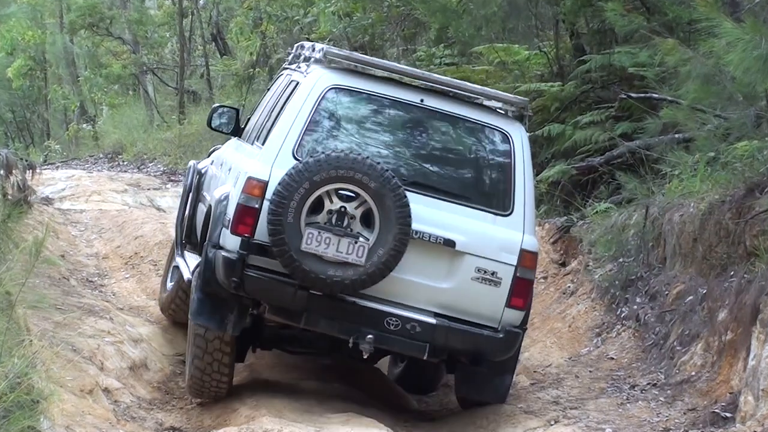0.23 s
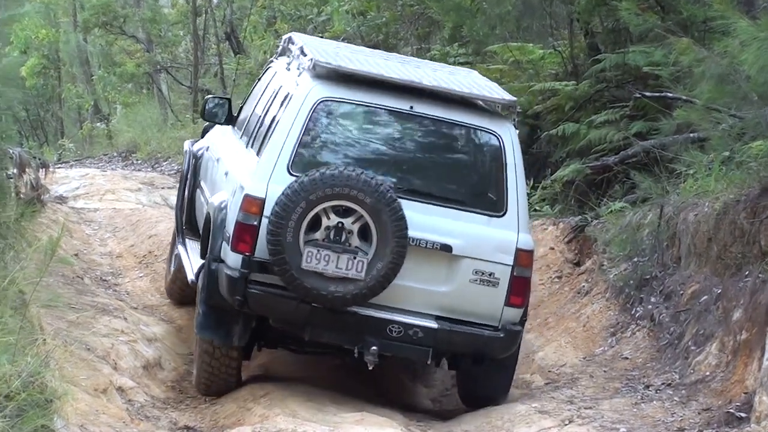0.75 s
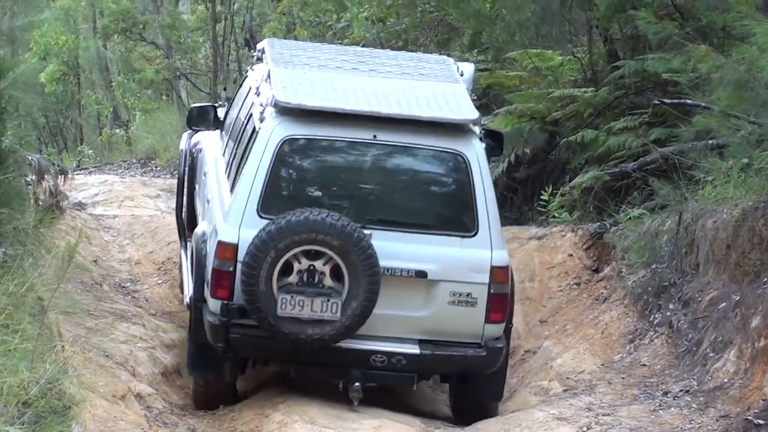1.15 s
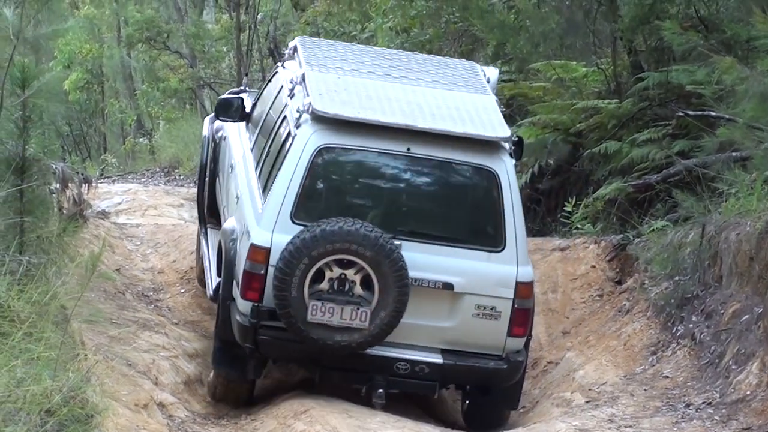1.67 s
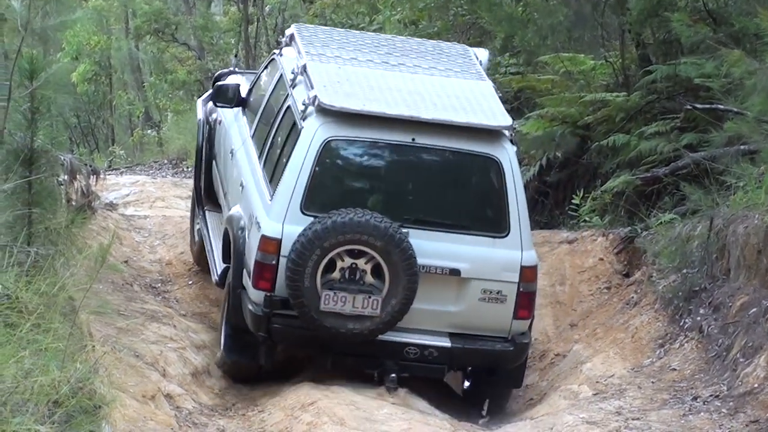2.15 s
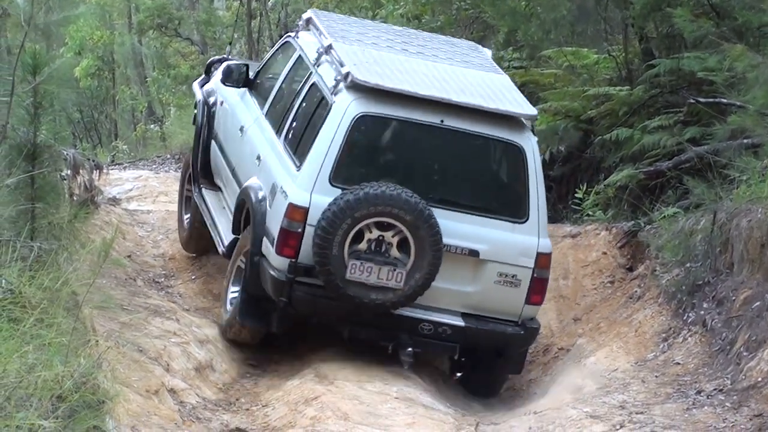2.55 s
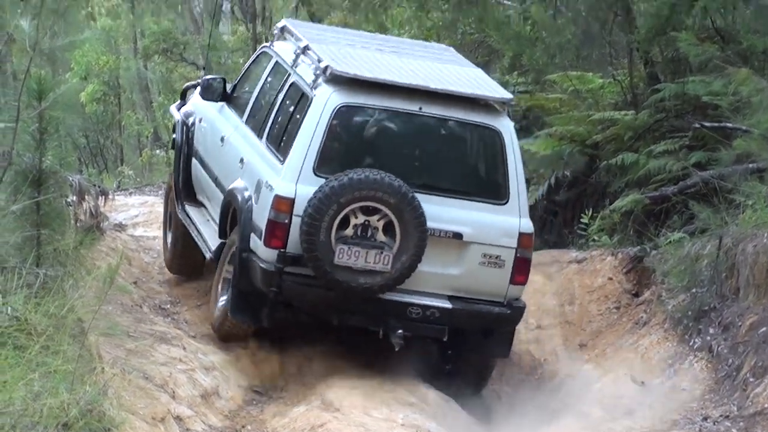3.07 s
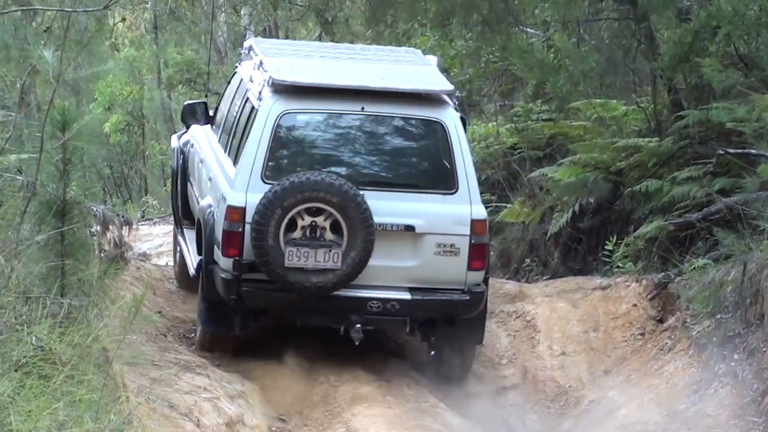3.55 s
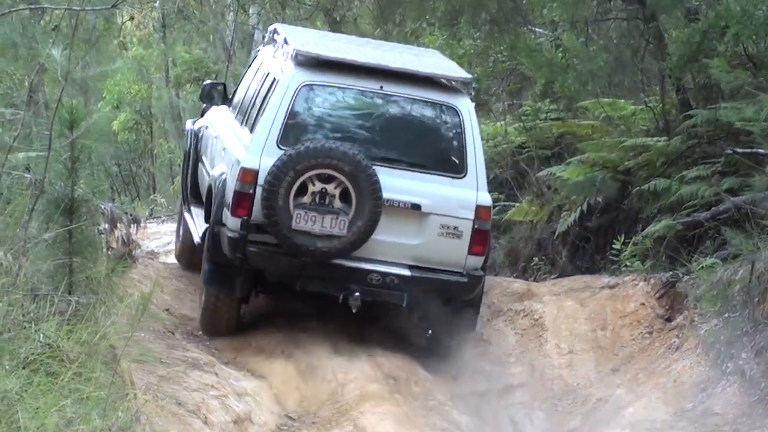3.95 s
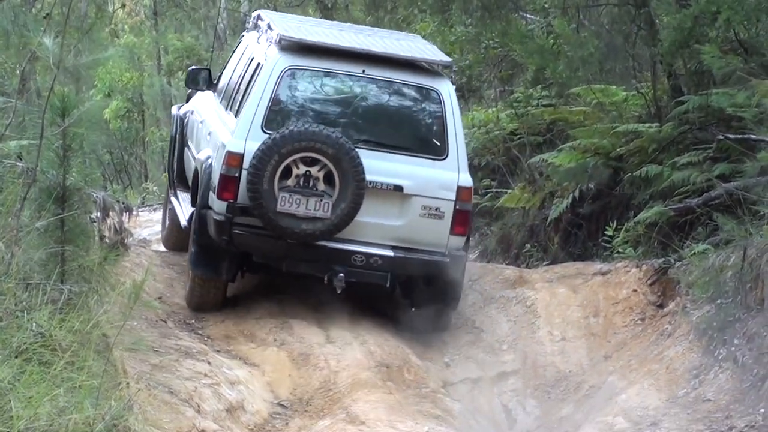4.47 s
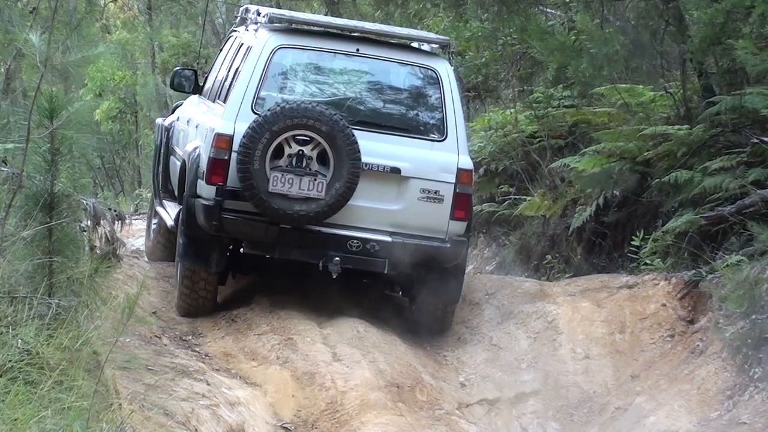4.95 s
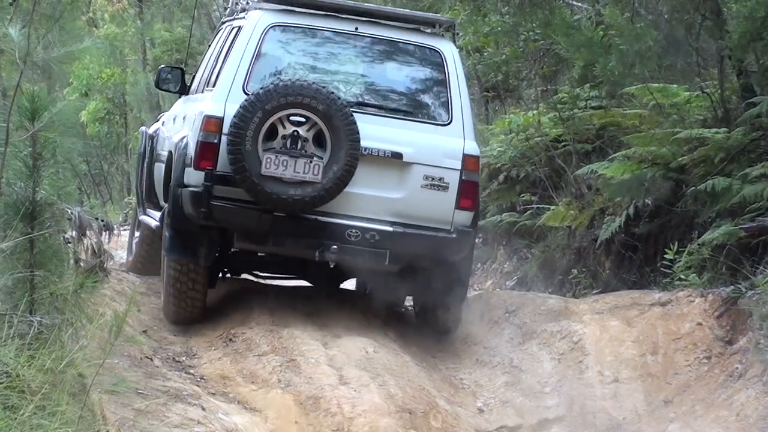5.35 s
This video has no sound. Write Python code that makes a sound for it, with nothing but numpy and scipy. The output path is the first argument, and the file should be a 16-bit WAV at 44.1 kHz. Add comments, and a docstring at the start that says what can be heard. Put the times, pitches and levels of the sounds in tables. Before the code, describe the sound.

Cicadas drone and rasp around a rumbling diesel truck that surges up a dirt ledge with spinning tyres, then drops to idle.

```python
"""A six-cylinder diesel truck crawls up a rutted forest track, revs once with its tyres scrabbling, and drops back to idle.
Firing tones and coloured noise make its exhaust; noise bursts and fan roar fill the engine bay; random grains are the tyres.
Cicadas sing all around: some drone in wavering sine partials, a near one rasps in paired clicks. Noise makes the forest.
The exhaust boom pushes an automatic gain control down, and the cicadas swell back slowly afterwards."""
import sys
import numpy as np
from scipy import signal
from scipy.fft import rfft, irfft, next_fast_len
from scipy.io import wavfile
from scipy.ndimage import uniform_filter1d, minimum_filter1d

SR = 44100
rng = np.random.default_rng(int(sys.argv[2]) if len(sys.argv) > 2 else 0)


def transcribe(u):
    """Save the signal u as a 16-bit wav file named by the first command-line argument.

    u: samples, shape (n,) or (channels, n), limited to [-1, 1]; the rate is SR.
    q: integer samples, one column per channel.
    """
    v = np.clip(np.atleast_2d(u).T, -1, 1)
    q = np.round(v * 32767).astype(np.int16)
    wavfile.write(sys.argv[1], SR, q)


N = 247401
LEFT_RIGHT = np.array([[1], [-1]])  # opposite signs for the two ports


def from_db(db):
    """Logarithmic level: decibels to amplitude gain."""
    return 10 ** (np.asarray(db) / 20)


def rms_one(x):
    """Power normalisation: scale to a mean square of 1."""
    return x / np.sqrt(np.mean(x ** 2) + 1e-20)


def in_time(rows):
    """Linear interpolation: a (time, value) curve read at every sample."""
    time_s, value = np.transpose(rows)
    return np.interp(np.arange(N) / SR, time_s, value)


def at_hz(points, hz):
    """Interpolation over log frequency: a (frequency, value) curve read at any frequency."""
    known_hz, value = np.transpose(points)
    return np.interp(np.log(hz + 1e-3), np.log(known_hz), value)


def colour(x, spectrum):
    """Spectral filtering: multiply the transform by a gain curve, then scale to rms 1."""
    size = next_fast_len(N + 4096)  # zero padding
    gain = from_db(at_hz(spectrum, np.fft.rfftfreq(size, 1 / SR)))
    return rms_one(irfft(rfft(x, size) * gain, size)[..., :N])


def drift(rate):
    """Low-passed noise: a smooth random curve of rms 1 that changes about `rate` times a second."""
    pole = np.exp(-80 * np.pi * rate / SR)
    noise = rng.standard_normal(N // 40 + 2002)  # one value per 40 samples
    slow = signal.lfilter([1], [1, -2 * pole, pole * pole], noise)[2000:]  # the filter has settled
    return np.interp(np.arange(N) / 40, np.arange(len(slow)), rms_one(slow))


def air(width):
    """Partial coherence: white noise common to both ports plus a share `width` in opposite phase."""
    common = rng.standard_normal(N)
    opposed = rng.standard_normal(N) * LEFT_RIGHT
    return common + width * opposed


def pan(db):
    """Level difference: left and right gains that differ by db."""
    return from_db(LEFT_RIGHT * db / 2)


def spread(x, firing_hz, idle_lead, lead):
    """Phase difference: the right port leads by a chosen angle (radians), set for low and high firing rates."""
    phase = np.interp(firing_hz, [73, 92], [idle_lead, lead])
    analytic = signal.hilbert(x, next_fast_len(N))[..., :N]
    return np.real(analytic * np.exp(-.5j * phase * LEFT_RIGHT))


def turns_of(hz):
    """Phase is the integral of frequency: cycles completed so far."""
    return np.cumsum(hz) / SR


def tone(turns, rough=0, rate=1):
    """Random modulation: a sine of rms 1 whose strength and phase flutter by the share `rough`."""
    flutter = 1 + rough * (drift(rate) + 1j * drift(rate)) if rough else 1
    return rms_one(np.real(flutter * np.exp(2j * np.pi * turns)))


# How well the underbody lets engine lines out; columns: freq_hz [Hz], gain_db [dB]
UNDERBODY = [(100, -3), (210, 0), (280, 3.5), (400, -2), (450, -15), (560, -9), (760, -6), (900, 9),
             (1400, -18)]


def lines(base_hz, table, rough, rate):
    """Harmonics through a fixed response: multiples of a rotation rate swell and fade as they glide."""
    turns = turns_of(base_hz)
    total = 0
    for multiple, db in table:
        k = round(multiple)
        gain = from_db(db + at_hz(UNDERBODY, k * base_hz))
        total = total + gain * tone(k * turns, rough, rate)
    return total


def firings(turns, decay, scatter_db, between):
    """Exponential decay: bursts of random strength, dying over `decay` of the interval, on a floor `between`."""
    count = turns.astype(int)
    strength = from_db(scatter_db * rng.standard_normal(2000))
    return rms_one(between + strength[count] * np.exp(-(turns - count) / decay))


# Exhaust pipe response, booming between 100 and 150 Hz; columns: freq_hz [Hz], level_db [dB at idle load]
PIPE = [(62, -35), (68, -29.5), (76, -24.5), (86, -23.5), (105, -19), (130, -21), (150, -19), (168, -32.5),
        (185, -32), (215, -38), (250, -48), (300, -42)]
IDLE_HZ = 64.6  # firing rate
# exhaust rumble: level at idle (dB), growth with speed (dB per octave), share of the load that it follows
RUMBLE_DB, RUMBLE_DB_PER_OCTAVE, RUMBLE_FOLLOWS_LOAD = -26, 10, 0.14
# engine bay noise (dB): steady up to the knee (Hz), then growing with speed (dB per octave)
BAY_DB, BAY_KNEE_HZ, BAY_DB_PER_OCTAVE = -27.5, 85.7, 15
# the truck crawls away; the bay is screened by the body and fades faster than the tailpipe
TAILPIPE_FADE_DB_PER_S, BAY_FADE_DB_PER_S = 0.17, 0.7


def engine_levels(firing_hz, load_db):
    """Source strength and distance: speed, load and fading set firing tone, octave, rumble and bay levels (dB)."""
    s = np.arange(N) / SR
    boom_db = load_db + at_hz(PIPE, firing_hz)
    octave_db = load_db + at_hz(PIPE, 2 * firing_hz)
    speed_db = RUMBLE_DB_PER_OCTAVE * np.log2(firing_hz / IDLE_HZ)
    rumble_db = RUMBLE_DB + speed_db + RUMBLE_FOLLOWS_LOAD * load_db
    octaves_above_knee = np.maximum(np.log2(firing_hz / BAY_KNEE_HZ), 0)
    bay_db = BAY_DB + BAY_DB_PER_OCTAVE * octaves_above_knee
    return boom_db, octave_db, rumble_db - TAILPIPE_FADE_DB_PER_S * s, bay_db - BAY_FADE_DB_PER_S * s


# Lines from unequal cylinders; columns: multiple [of the six-firing cycle rate], level_db [relative dB]
UNEVEN = [(8, -11), (9, -9.5), (10, -9), (14, -17.5), (15, -15.5), (16, -7.5), (18, -16.5), (22, -19),
          (24, -16.5)]
# Exhaust rumble spectrum; columns: freq_hz [Hz], level_db [relative dB per Hz]
RUMBLE = [(25, -43), (50, -29), (80, -13.5), (130, 1.5), (185, 4.5), (250, -3.5), (340, -4.5), (400, -11),
          (480, -25.5), (700, -60)]


def exhaust(firing_hz, boom_db, octave_db, rumble_db):
    """Periodic gas pulses: firing tones, weaker lines from unequal cylinders, and noisy puffs at the tailpipe."""
    turns = turns_of(firing_hz)
    boom = from_db(boom_db) * tone(turns) + from_db(octave_db) * tone(2 * turns)
    uneven = lines(firing_hz / 6, UNEVEN, rough=.45, rate=6)
    bursts = firings(turns, decay=0.55, scatter_db=-0.5, between=0.44)
    puffs = colour(rng.standard_normal(N) * bursts, RUMBLE)
    return boom + from_db(rumble_db) * (from_db(-3.0) * uneven + from_db(-1.0) * puffs)


# Fan blade tones; columns: multiple [of the blade rate], level_db [relative dB]
BLADES = [(1, -2.5), (2, -15), (3, -28)]


def fan_tones(firing_hz, rumble_db):
    """Blade-passing tones: the viscous clutch slips more at speed, so the blade rate lags behind the engine."""
    blades_per_firing = np.interp(firing_hz, [72, 88, 145], [3.26, 3.18, 3.09])
    blades = lines(firing_hz * blades_per_firing, BLADES, rough=.35, rate=10)
    return from_db(rumble_db - 3.0 - 0.042 * (firing_hz - 54)) * blades


# Diesel knock spectrum; columns: freq_hz [Hz], level_db [relative dB per Hz]
CLATTER = [(250, -26), (400, -4), (490, -7.5), (620, -3), (800, -1.5), (1150, -2), (1480, 1), (1750, -3.5),
           (2000, -0.5), (2250, -6), (2450, -1.5), (2650, -16), (3050, -3.5), (3400, -19), (4400, -37)]
# Air through the cooling fan; columns: freq_hz [Hz], level_db [relative dB per Hz]
ROAR = [(260, -57), (450, -6.5), (515, -9.5), (595, -5.5), (670, -3.5), (878, -3), (1090, -7), (1390, -6.5),
        (1660, -9.5), (1880, -12.5), (2270, -19), (2550, -17), (3400, -19), (4420, -49), (7480, -120)]


def engine_bay(firing_hz, turns, bay_db, takeover_hz=92):
    """Impulsive and flow noise: diesel knock rules at idle; the fan's roar grows steeply with speed and covers it."""
    fan_share = 1 / (1 + (takeover_hz / firing_hz) ** 7)  # of power
    bursts = firings(turns, decay=0.34, scatter_db=3, between=1.0)
    knock = colour(air(width=0.033) * bursts, CLATTER)
    roar = colour(air(width=0.027) * from_db(0.87 * drift(22.0)), ROAR)
    knock_part = from_db(-2.28) * np.sqrt(1 - fan_share) * knock
    roar_part = from_db(0.84) * np.sqrt(fan_share) * roar
    return from_db(bay_db) * (knock_part + roar_part)


# Timing gear whine, heard while the truck is close; columns: time_s [s], level_db [relative dB]
WHINE = [(0, -42), (.6, -36.5), (1.2, -43), (1.5, -57), (1.8, -38), (2.1, -63)]


def gear_whine(firing_hz):
    """Tooth-mesh frequency: gear teeth meet 23 times a firing and sound a fluttering tone."""
    return from_db(in_time(WHINE)) * tone(23 * turns_of(firing_hz), rough=1.2, rate=25)


# Distant insects and leaves; columns: freq_hz [Hz], level_db [relative dB per Hz]
FOREST = [(40, -18), (500, -13.5), (760, -4.5), (1150, -12), (2000, -7), (2800, -7.5), (3400, -7),
          (3800, 2.5), (4400, 1), (5200, -6), (6600, -2), (8500, -11.5), (9500, -12.5), (10500, -27.5),
          (13000, -29.5), (16000, -30)]
FOREST_DB, FOREST_PAN_DB = -26.5, 1.0  # level; left minus right


def forest_air():
    """Diffuse sound: many distant insects and leaves merge into steady coloured noise."""
    return pan(FOREST_PAN_DB) * from_db(FOREST_DB) * colour(air(width=0.12), FOREST)


# Droning cicadas' partials; columns: pitch_hz [Hz, before wander], level_db [relative dB]
DRONE = [(4667, -48), (4780, -44), (4888, -46), (5017, -40), (5103, -40), (5259, -35), (5329, -41),
         (5496, -31), (5550, -34), (5722, -34), (5771, -34), (5965, -30), (6223, -34), (6444, -36),
         (6691, -41)]
DRONE_DB, DRONE_PAN_DB = 4, -1  # gain on the partials; left minus right


def droning_cicadas(wander=0.0010584, width=0.096):
    """Multipath fading: fast tymbals' clear partials waver together and fade singly on paths through the trees."""
    clock = turns_of(1 + wander * drift(2.78))
    direct = sum(from_db(db) * tone(hz * clock, rough=0.86, rate=12.7) for hz, db in DRONE)
    scattered = sum(from_db(db) * tone(hz * clock, rough=2.8, rate=9) for hz, db in DRONE)
    return pan(DRONE_PAN_DB) * from_db(DRONE_DB) * (direct + width * scattered * LEFT_RIGHT)


# The near cicada's click spectrum; columns: freq_hz [Hz], level_db [relative dB per Hz]
RASP = [(6000, -45), (6500, -12), (6750, -7), (7000, -2), (7550, 2.5), (8000, 1), (8400, -6), (8800, -13),
        (9200, -49), (9650, -35), (10400, -43), (12000, -72)]
RASP_HZ = 81.9  # mean rate of muscle pulls
RASP_DB, RASP_ECHO_DB, RASP_PAN_DB = -23.5, -21.5, 3  # clicks; hiss; left minus right


def rasping_cicada(pair_gap_s=.00165, jitter_s=.00005, scatter_db=2.0):
    """Buckling: each muscle pull clicks the tymbal twice; the trees smear the clicks into a hiss behind them."""
    pull_turns = turns_of(RASP_HZ * (1 + .003 * drift(2)))
    pulls = np.flatnonzero(np.diff(np.floor(pull_turns)))
    clicks = np.zeros(N)
    for delay in (0, pair_gap_s):
        chance = rng.uniform(-1, 1, (600, 2))[:len(pulls)]  # columns: timing, strength
        at = pulls + (delay + jitter_s * chance[:, 0]) * SR
        clicks[np.clip(at, 0, N - 1).astype(int)] = from_db(scatter_db * chance[:, 1])
    direct = from_db(RASP_DB) * colour(clicks, RASP)
    hiss = from_db(RASP_ECHO_DB) * colour(air(width=0.24), RASP)
    return pan(RASP_PAN_DB) * (direct + hiss)


# Sand and stone under the tread; columns: freq_hz [Hz], level_db [relative dB per Hz]
GRIT = [(300, 8.5), (1000, -22), (3000, -16), (6000, 3), (9000, -7), (12000, -14.5), (16000, -37)]
# the tyres roll quietly, then spin once on the ledge
ROLL_DB, SPIN_DB = -54, -27.5
SPIN_START_S, SPIN_ATTACK_S, SPIN_HOLD_S, SPIN_RELEASE_S = 2.6, 0.46, .4, 0.51


def tyres(grains_per_s=5000):
    """Granular noise: dense random impacts of sand and stone crushed and thrown by the tread."""
    corners_s = np.cumsum([SPIN_START_S, SPIN_ATTACK_S, SPIN_HOLD_S, SPIN_RELEASE_S])
    spin = np.interp(np.arange(N) / SR, corners_s, [0, 1, 1, 0])
    struck = rng.random(N) < grains_per_s / SR
    grains = struck * from_db(3.84 * np.minimum(rng.exponential(1, N), 4))
    return (from_db(ROLL_DB) + from_db(SPIN_DB) * spin) * colour(grains * air(width=0.038), GRIT)


# Engine speed; columns: time_s [s], firing_hz [Hz]
SPEED = [(0.0, 63.56), (0.2, 64.07), (0.41, 61.8), (0.8, 65.46), (0.98, 64.07), (1.34, 68.15), (1.69, 63.8),
         (2.05, 84.03), (2.5, 91.93), (3.19, 145.6), (3.31, 154.2), (3.55, 132), (3.94, 80.6), (4.11, 70.3),
         (4.4, 73.58), (4.72, 68.53), (5.2, 73.1), (5.61, 68.2)]
# The driver feeds in power, then lifts off at the top of the ledge; columns: time_s [s], load_db [dB re idle]
LOAD = [(0, -1), (1.65, 1), (1.85, 4), (2.35, 6.5), (2.7, 14.5), (3.28, 16.5), (3.38, 6), (3.55, 7.5),
        (3.68, -6), (4.0, -12.5), (4.4, -8.5), (4.7, 1), (5.2, -5), (5.6, -1.5)]
BAY_PAN_DB = 0.8  # left minus right


def scene():
    """Superposition: truck and forest add at a pair of closely spaced microphone ports."""
    firing_hz, load_db = in_time(SPEED), in_time(LOAD)
    boom_db, octave_db, rumble_db, bay_db = engine_levels(firing_hz, load_db)
    hum = exhaust(firing_hz, boom_db, octave_db, rumble_db) + fan_tones(firing_hz, rumble_db)
    bay = engine_bay(firing_hz, turns_of(firing_hz), bay_db) + gear_whine(firing_hz)
    truck = spread(hum, firing_hz, idle_lead=0.074, lead=0.47)
    truck = truck + spread(pan(BAY_PAN_DB) * bay, firing_hz, idle_lead=0.3, lead=0.25)
    forest = forest_air() + droning_cicadas() + rasping_cicada()
    return truck + forest + tyres()


def gain_control(x, ceiling_db=-9.0, attack_s=0.061, release_db_per_s=2.0):
    """Dynamic compression: whatever exceeds the ceiling turns the gain down quickly; it creeps back up."""
    power = uniform_filter1d(np.mean(x ** 2, axis=0), size=1500)
    level_db = 10 * np.log10(power + 1e-12)
    ramp_db = release_db_per_s * np.arange(N) / SR
    # a running maximum over the ramp lets each cut shrink at the release rate
    cut_db = np.maximum.accumulate(np.maximum(level_db - ceiling_db, 0) + ramp_db) - ramp_db
    pole = np.exp(-1 / (attack_s * SR))
    return x * from_db(-signal.lfilter([1 - pole], [1, -pole], cut_db))


def limiter(x):
    """Peak limiting: ease the gain down for some milliseconds around any peak above 0.97 of full scale."""
    allowed = .97 / np.maximum(np.abs(x).max(axis=0), .97)
    return x * uniform_filter1d(minimum_filter1d(allowed, size=601), size=601)


LOW_CUT_HZ, TOP_CUT_HZ = 19, 15750


def record(dry):
    """Band limiting and compression: gain control, a low cut, a peak limiter and a steep cut at the top."""
    low_cut = signal.butter(2, LOW_CUT_HZ, "high", fs=SR, output="sos")
    top_cut = signal.ellip(10, .1, 80, TOP_CUT_HZ, fs=SR, output="sos")
    levelled = signal.sosfilt(low_cut, gain_control(dry))
    return signal.sosfilt(top_cut, limiter(levelled))


dry = scene()
out = record(dry)
transcribe(out)
```